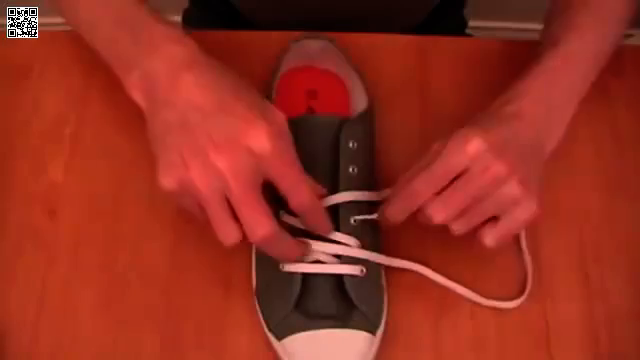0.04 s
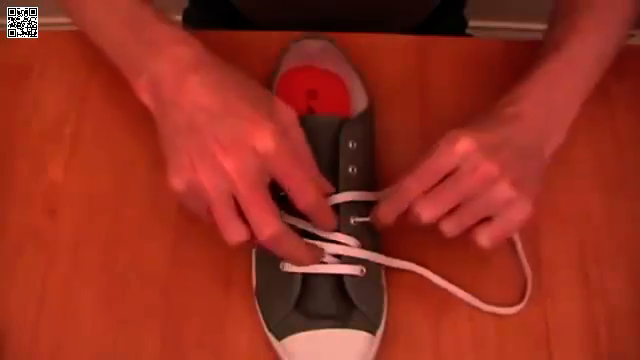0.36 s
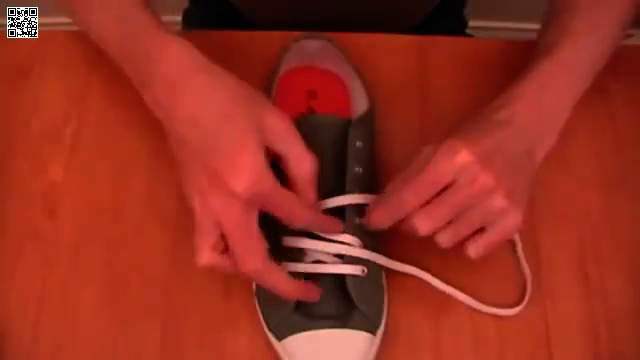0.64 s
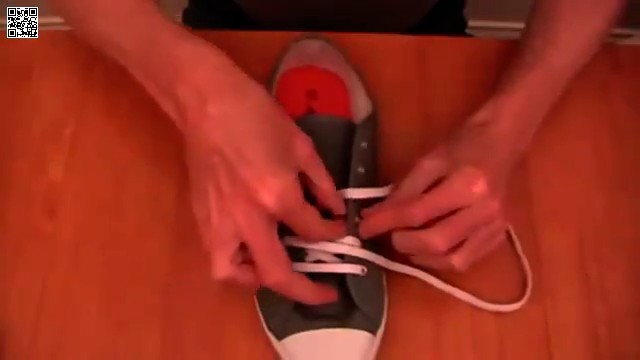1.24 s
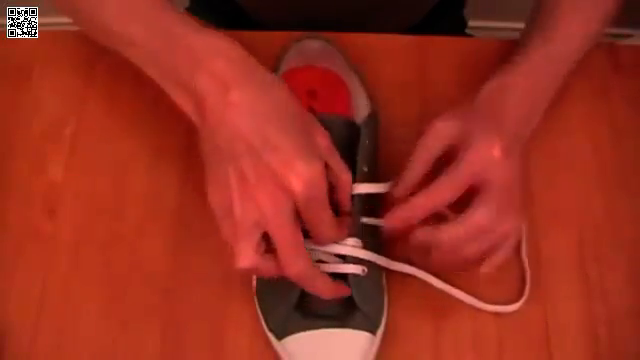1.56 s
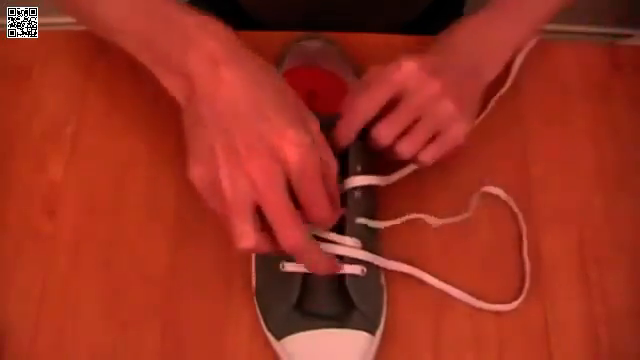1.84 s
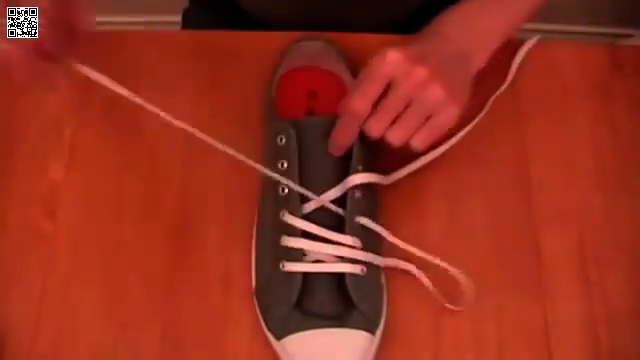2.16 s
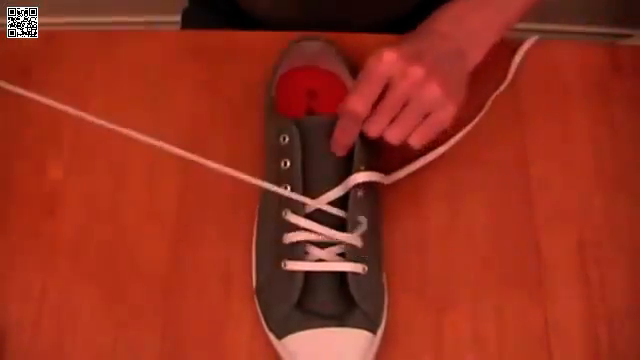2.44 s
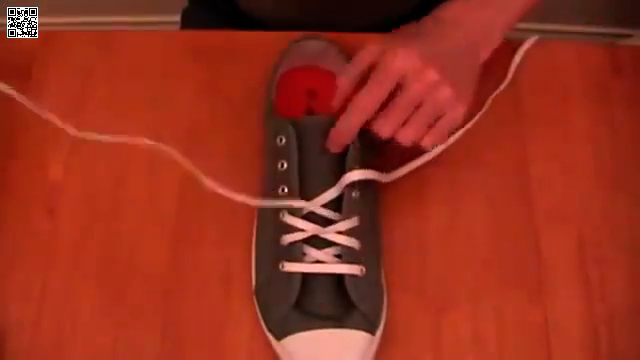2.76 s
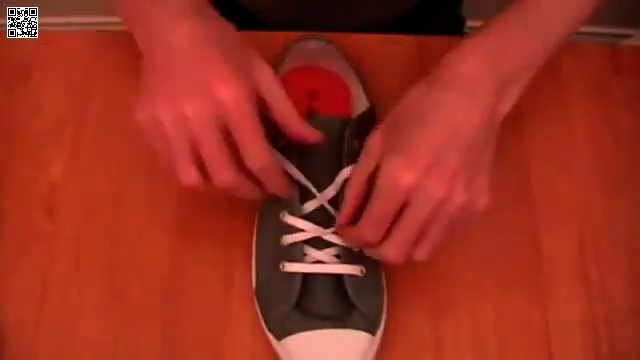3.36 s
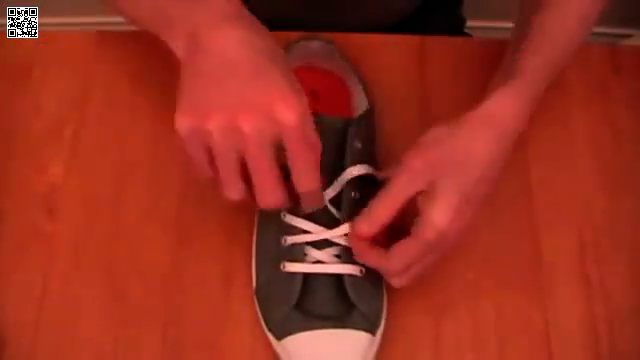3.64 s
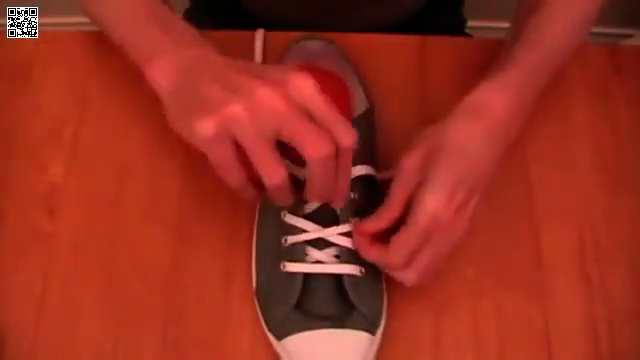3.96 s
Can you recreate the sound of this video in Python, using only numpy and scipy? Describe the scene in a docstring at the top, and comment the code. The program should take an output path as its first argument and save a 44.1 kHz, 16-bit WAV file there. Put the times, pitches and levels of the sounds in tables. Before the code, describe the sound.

A shoelace is threaded and pulled through a canvas shoe, with rustles and small clicks.

```python
"""Lacing a canvas shoe

A canvas shoe is laced on a wooden table in a small room, heard from close by. Fingers rustle over the
canvas by stick-slip friction, and the hard lace tip clicks on the eyelets. Then the lace is drawn through
in one long pull: its ridges pluck the eyelet, so the pitch of the purr follows the speed. The loose tip
drops on the table, exciting a few quickly damped modes."""
import sys
import numpy as np
from scipy import signal
from scipy.fft import rfft, irfft
from scipy.io import wavfile
from scipy.ndimage import uniform_filter1d

SR = 44100
rng = np.random.default_rng(int(sys.argv[2]) if len(sys.argv) > 2 else 0)


def to_wav(s):
    """Save 16-bit WAV."""
    ch = np.atleast_2d(s).T  # columns
    pcm = np.round(np.clip(ch, -1, 1) * 32767)  # PCM
    wavfile.write(sys.argv[1], SR, pcm.astype(np.int16))


N = 176400
TIME = np.arange(N) / SR

# spectrum of rubbed canvas: frequency_hz, gain_db
CANVAS_SPECTRUM = [(100, -4.5), (300, -5.5), (800, -1), (1150, -3), (2300, -0.5), (2900, -1.5), (3800, -1),
                   (4700, -4.5), (6200, -4), (8000, -7), (10500, -14)]


def from_db(db):
    """Amplitude ratio: a factor of ten for every 20 dB."""
    return 10 ** (np.asarray(db) / 20)


def rms_one(x):
    """Normalisation to unit mean power."""
    return x / np.sqrt(np.mean(x ** 2) + 1e-20)


def curve(rows):
    """Linear interpolation between rows of time_s, value."""
    return np.interp(TIME, *np.transpose(rows))


def envelope(rows):
    """Amplitude envelope from rows of time_s, level_db, fading to silence outside them."""
    fade_s = .02
    inside_s = np.minimum(TIME - rows[0][0], rows[-1][0] - TIME)
    return from_db(curve(rows)) * np.clip(inside_s / fade_s + 1, 0, 1)


def coloured(x, spectrum, tilt_db=0):
    """Zero-phase filtering by rows of frequency_hz, gain_db, with a tilt per octave and no DC."""
    hz = np.maximum(np.fft.rfftfreq(N, 1 / SR), 1)
    points_hz, points_db = np.transpose(spectrum)
    octaves = np.log2(np.clip(hz, 500, 12000) / 3000)
    gain_db = np.interp(np.log(hz), np.log(points_hz), points_db) + tilt_db * octaves
    return irfft(rfft(x, N) * from_db(gain_db) * hz / np.hypot(hz, 20), N)


def noise():
    """White noise: equal mean power in every hertz."""
    return rng.standard_normal(N)


def drift(rate_hz):
    """Random fluctuation: low-passed noise of unit rms."""
    return rms_one(signal.sosfilt(signal.butter(2, rate_hz, fs=SR, output="sos"), noise()))


def friction(spectrum, per_s, spread_db, clump_db, tilt_db=0):
    """Stick-slip friction: fibres catch and let go in tiny clicks of wavering strength; unit rms."""
    sizes = from_db(spread_db * np.minimum(rng.exponential(1, N), 5)) * rng.choice([-1, 1], N)
    slips = sizes * (rng.random(N) < per_s / SR) * from_db(clump_db * drift(30))
    return rms_one(coloured(slips, spectrum, tilt_db))


def struck(hits, modes, crack_db, crack_t60_s, low_hz):
    """Modal response: each impact gives a noisy crack and damped sinusoids, weakened below low_hz."""
    t = TIME[:SR // 3]
    ring = sum(from_db(db - 60 * t / t60) * np.sin(2 * np.pi * hz * t) for hz, db, t60 in modes)
    crack = from_db(crack_db - 60 * t / crack_t60_s)
    out = np.zeros(N + SR)
    for start_s, db in hits:
        start = int(start_s * SR)
        out[start:start + len(t)] += from_db(db) * (ring + crack * rng.standard_normal(len(t)))
    return signal.sosfilt(signal.butter(4, low_hz, "high", fs=SR, output="sos"), out[:N] + 1e-18)


def smeared(x, resonances):
    """Group delay: all-pass sections hold back the sound around each resonance."""
    for hz, width_hz in resonances:
        radius = np.exp(-np.pi * width_hz / SR)
        poles = [1, -2 * radius * np.cos(2 * np.pi * hz / SR), radius ** 2]
        x = signal.lfilter(poles[::-1], poles, x)
    return x


def room_air():
    """Ambient noise: a faint steady rumble and hiss, partly coherent between left and right."""
    # noise spectrum, and side relative to mid: frequency_hz, gain_db
    spectrum = [(25, -25), (50, -6), (78, -1), (130, -5.5), (220, -13.5), (340, -12.5), (520, -9.5),
                (780, -18.5), (1100, -15.5), (2200, -18), (4500, -20.5), (7500, -23.5), (10500, -38)]
    width = [(60, -5), (130, 2), (230, 10.5), (500, 4.5), (800, 9.5), (1200, 6), (2200, 2), (4000, -5),
             (8000, -20)]
    mid = rms_one(coloured(noise(), spectrum))
    side = coloured(rms_one(coloured(noise(), spectrum)), width)
    return from_db(-64.5) * np.array([mid + side, mid - side])


def reverberation(x):
    """Diffuse reflections decay exponentially; the treble is nearly central and dies slightly sooner."""
    # tail spectrum, and side relative to mid: frequency_hz, gain_db
    spectrum = [(100, 6), (500, 5), (1500, 2), (3500, -3), (6000, -4.5), (10000, -10)]
    width = [(100, -3), (400, -10.5), (1100, -10), (2500, -15), (6000, -76), (10000, -13)]
    low_t60_s, treble_t60_s, split_hz, delay_s = 0.41, 0.39, 3700, 0.0058
    mid = coloured(noise(), spectrum)
    side = coloured(coloured(noise(), spectrum), width)
    field = np.array([mid + side, mid - side])
    lows = signal.sosfiltfilt(signal.butter(2, split_hz, fs=SR, output="sos"), field)
    slow, quick = (from_db(-60 * TIME / t60) * (TIME > delay_s) for t60 in (low_t60_s, treble_t60_s))
    tail = (lows * slow + (field - lows) * quick) / np.sqrt(np.sum(slow ** 2))
    return from_db(-12) * signal.fftconvolve(tail, x[None], axes=1)[:, :N]


def handling():
    """Friction and cavity resonance: fingers and lace rub the canvas, and the shoe's hollow answers."""
    # rubbing, and the hollow rustle while threading and regripping: time_s, level_db
    rubbing = [(.15, -77), (.25, -67.5), (.3, -74), (.38, -67), (.41, -65), (.52, -65), (.57, -63.5),
               (.65, -56), (.73, -68), (.78, -59), (.9, -69.5), (.99, -60.5), (1.08, -61.5), (1.17, -55),
               (1.24, -61.5), (1.33, -57.5), (1.41, -62), (1.57, -56.5), (1.66, -68.5), (1.76, -69.5)]
    threading = [(.2, -68), (.25, -67), (.28, -50.5), (.38, -55.5), (.44, -63.5), (.49, -56), (.56, -59.5),
                 (.7, -58), (.75, -66.5), (.83, -51.5), (.89, -69), (.96, -54), (1.05, -58.5), (1.11, -54),
                 (1.18, -56), (1.26, -66.5), (1.42, -57.5), (1.49, -56), (1.55, -74), (1.68, -63),
                 (1.75, -79), (1.82, -59.5), (1.85, -52), (1.92, -49.5)]
    regrip = [(3.3, -72), (3.39, -69), (3.435, -54), (3.49, -67), (3.6, -66), (3.78, -62), (3.88, -57),
              (3.94, -50), (4.0, -69)]
    # response of the hollow: frequency_hz, gain_db
    cavity_spectrum = [(60, -14.5), (130, -12.5), (200, -19.5), (320, -2.5), (440, -3.5), (545, 5.5),
                       (660, -7), (850, -8.5), (1300, -16.5), (3000, -29)]
    rub = friction(CANVAS_SPECTRUM, per_s=5000, spread_db=0, clump_db=1.0)
    hollow = friction(cavity_spectrum, per_s=700, spread_db=3.5, clump_db=1.5)
    return envelope(rubbing) * rub + from_db(-1) * (envelope(threading) + envelope(regrip)) * hollow


def brushes():
    """Transient friction: lace and fingers brush canvas and table, each with one scraping resonance."""
    # strokes: start_s, length_s, level_db, tilt_db_per_octave, pitch_hz
    strokes = [(0.261, 0.02, -48.5, 1.5, 5000), (0.463, 0.035, -51, -0.5, 5200),
               (0.808, 0.016, -46, -4, 870), (1.437, 0.038, -49.5, -0.5, 2290), (1.833, .012, -53, 4, 3670),
               (2.775, 0.049, -52, -0.5, 1860), (2.83, 0.044, -55.5, 2.5, 6500),
               (3.009, 0.014, -62, -2, 2200), (3.211, 0.017, -42.5, 1, 3600),
               (3.414, 0.025, -52, -2.5, 1540), (3.505, 0.084, -59, -1.5, 3740),
               (3.625, 0.067, -55.5, -0.5, 3800), (3.705, 0.12, -57.5, 0.5, 4000),
               (3.808, 0.062, -56.5, -1, 4270), (3.872, 0.086, -51.5, 1.5, 2030)]
    attack_s, release_s, scrape_db = .007, 0.019, -3.5
    out = np.zeros(N)
    for start_s, length_s, level_db, tilt_db, pitch_hz in strokes:
        rise = np.clip((TIME - start_s) / attack_s, 0, 1)
        fall = np.exp(-np.maximum(TIME - start_s - length_s, 0) / release_s)
        rub = friction(CANVAS_SPECTRUM, per_s=5000, spread_db=0, clump_db=1.1, tilt_db=tilt_db)
        scrape = signal.lfilter(*signal.iirpeak(pitch_hz, Q=6.3, fs=SR), rub)
        out += from_db(level_db) * rise * fall * rms_one(rub + from_db(scrape_db) * scrape)
    return out


def table_bumps():
    """Low modes: the table thuds softly under the shoe, the hand and the falling lace tip."""
    # impacts: start_s, level_db
    hits = [(1.155, -20), (1.475, -10.5), (1.505, -15), (1.899, -3.5), (1.9035, 6.5), (1.909, -10),
            (1.931, -1.5), (2.63, -15), (3.203, -10.5), (3.214, -17), (3.43, -19.5), (3.9195, -5),
            (3.927, -12)]
    # low modes: pitch_hz, gain_db, t60_s
    modes = [(72, -52, 0.18), (130.4, -43.5, 0.27), (174.2, -52.5, 0.27), (246, -39, 0.02),
             (383, -35, 0.028), (604, -35.5, 0.04), (926, -42.5, 0.017)]
    return struck(hits, modes, crack_db=-68, crack_t60_s=0.018, low_hz=86.5)


def flap_knocks():
    """Damped free vibration: the stiff eyelet flap rings briefly as fingers knock it."""
    # impacts: start_s, level_db
    hits = [(.7995, -6.5), (.8015, 1), (.818, -9), (.824, -6), (.831, -28), (.876, -17)]
    # flap modes: pitch_hz, gain_db, t60_s
    modes = [(333, -49, 0.04), (540, -45, 0.1), (840, -58, .015), (1460, -31.5, 0.012), (1990, -40, .012),
             (2790, -38, 0.0087), (3600, -41, 0.01), (6000, -58, .004)]
    return struck(hits, modes, crack_db=-61, crack_t60_s=0.0088, low_hz=226)


def canvas_ticks():
    """Cushioned impact: the lace tip meets yielding canvas and gives only a faint tick."""
    # impacts: start_s, level_db
    hits = [(.9428, 1.5), (.99, -12.5), (1.037, -12.5), (1.062, -13.5), (1.155, -10.5), (1.332, -13.5),
            (1.5215, -9), (1.902, 2)]
    # modes of tip on canvas: pitch_hz, gain_db, t60_s
    modes = [(520, -41, 0.044), (1344, -49, 0.036), (2870, -38, 0.017), (3300, -38, 0.0095),
             (4190, -42, 0.015), (5460, -46, 0.0074)]
    return struck(hits, modes, crack_db=-59, crack_t60_s=0.013, low_hz=294)


def eyelet_clicks():
    """Hard impact: the brief contact of the tip with a metal eyelet excites high modes."""
    # impacts: start_s, level_db
    hits = [(.013, -19.5), (.257, -22), (.2585, -15.5), (.2614, -1), (.427, -37), (.432, -27.5),
            (.776, -29), (2.7745, -24.5)]
    # modes of tip on eyelet: pitch_hz, gain_db, t60_s
    modes = [(520, -39, 0.12), (950, -36.5, 0.029), (1740, -56, 0.0058), (2440, -24.5, 0.017),
             (3090, -21, 0.0047), (3700, -22.5, 0.0069), (5470, -27, 0.0079), (6450, -21.5, 0.0048),
             (6940, -19.5, 0.006), (7700, -55, 0.0059), (9700, -89, 0.0017)]
    return struck(hits, modes, crack_db=-32, crack_t60_s=0.028, low_hz=725)


def tip_drop():
    """Impact and rebound: the lace tip falls on the table and bounces in bright taps."""
    # impacts: start_s, level_db
    hits = [(3.1845, -39.5), (3.2011, -0.5), (3.2109, -25), (3.2145, -16.5)]
    # modes of tip on wood: pitch_hz, gain_db, t60_s
    modes = [(1530, -36, 0.029), (1820, -36, 0.032), (2300, -56, .014), (2590, -23.5, 0.025),
             (3660, -30, .015), (3790, -21.5, 0.024), (4070, -22.5, 0.023), (4880, -23, 0.016),
             (5430, -25, 0.023), (5780, -18.5, 0.016), (6180, -18, 0.017), (7570, -19.5, 0.009),
             (9000, -29, 0.024), (9360, -31, 0.017)]
    return struck(hits, modes, crack_db=-21, crack_t60_s=0.021, low_hz=1620)


def lace_hiss():
    """Sliding friction: dense slips of the fibres in the eyelet merge into broadband noise."""
    # course of the hiss: time_s, level_db
    levels = [(1.834, -61), (1.842, -57.5), (1.89, -51), (1.94, -55), (2.05, -55.5), (2.5, -56),
              (2.6, -59.5), (2.66, -65), (2.71, -81)]
    # its spectrum: frequency_hz, gain_db
    spectrum = [(200, -6.5), (700, -4), (1300, -3), (1800, 0), (2300, 4), (3000, -4), (3700, 0),
                (4600, -4.5), (6300, -1), (8000, -7.5), (9700, -7), (11000, -17.5)]
    return from_db(3.5) * envelope(levels) * friction(spectrum, per_s=12000, spread_db=1.0, clump_db=0.77)


def lace_purr():
    """Quasi-periodic excitation: each ridge of the weave plucks the eyelet, so pitch follows speed."""
    # speed of the pull: time_s, ridges_per_s
    speeds = [(1.92, 140), (2.0, 160), (2.07, 224), (2.13, 269), (2.2, 348), (2.27, 358), (2.33, 315),
              (2.39, 436), (2.48, 400), (2.57, 270), (2.64, 126)]
    # unevenness of the sliding: time_s, share_of_speed
    roughness = [(1.95, .2), (2.12, 0.091), (2.25, 0.078), (2.34, .21), (2.6, .19)]
    # course of the purr: time_s, level_db
    levels = [(1.94, -56), (1.978, -49.5), (2.022, -45.5), (2.066, -49.5), (2.122, -42), (2.202, -38.5),
              (2.21, -41.5), (2.362, -39.5), (2.454, -43.5), (2.47, -40.5), (2.588, -50.5), (2.61, -64),
              (2.654, -56.5), (2.7, -74)]
    # ringing of the shoe: pitch_hz, bandwidth_hz
    shoe_resonances = [(330, 170), (540, 76), (720, 190)]
    # response of the shoe: frequency_hz, gain_db
    shoe_spectrum = [(60, -11), (140, 6.5), (300, -0.5), (520, 2.5), (720, 0), (850, -6), (1100, -18),
                     (1600, -28), (4000, -52)]
    waver_share, ridge_spread_db, flutter_db = .05, 1.5, 2
    speed = curve(speeds)
    rate_hz = speed * np.exp(curve(roughness) * drift(150) + waver_share * drift(25))
    ridges = np.diff(np.floor(np.cumsum(rate_hz) / SR), prepend=0)
    plucks = ridges * from_db(ridge_spread_db * noise()) - rate_hz / SR   # centred near zero
    purr = coloured(smeared(plucks, shoe_resonances), shoe_spectrum)
    fast = np.clip((speed - 200) / 100, 0, 1)   # a fast lace loses its lows
    purr = (1 - fast) * purr + fast * coloured(purr, [(170, -34), (270, 0)])
    running_rms = np.sqrt(uniform_filter1d(purr ** 2, size=2205) + 1e-12)   # over 50 ms
    flutter = from_db(flutter_db * drift(49))
    return from_db(-1.4) * envelope(levels) * flutter * purr / running_rms


def scene():
    """Superposition: direct sound from the middle, with reverberation and room air around it."""
    direct = lace_purr() + lace_hiss() + handling() + brushes()
    direct += tip_drop() + eyelet_clicks() + canvas_ticks() + flap_knocks() + table_bumps()
    return direct + reverberation(direct) + room_air()


def record(dry):
    """Band limiting: an elliptic low-pass cuts the top steeply."""
    cutoff_hz = 10800
    return signal.sosfilt(signal.ellip(10, .3, 80, cutoff_hz, fs=SR, output="sos"), dry)


dry = scene()
out = record(dry)
to_wav(out)
```